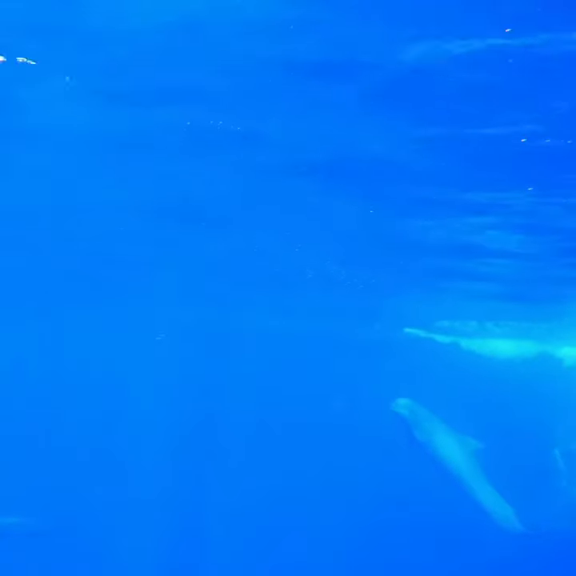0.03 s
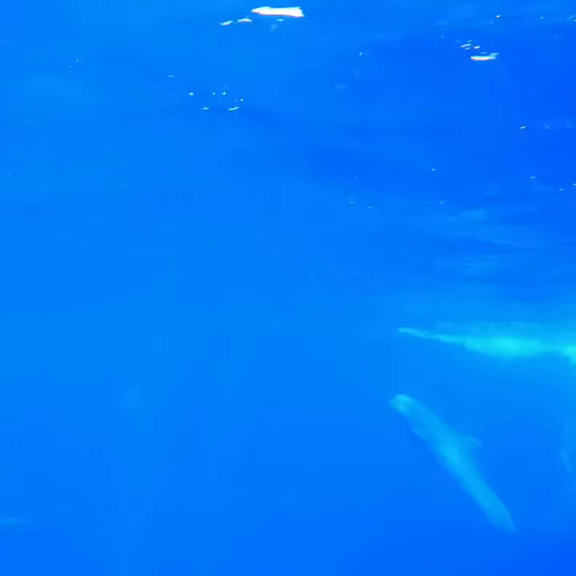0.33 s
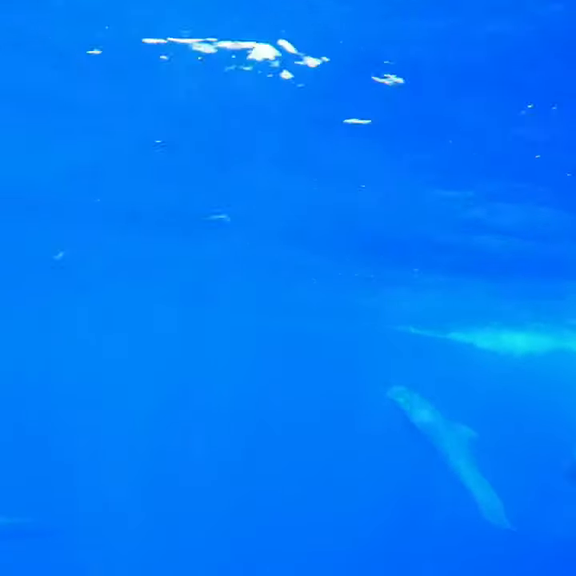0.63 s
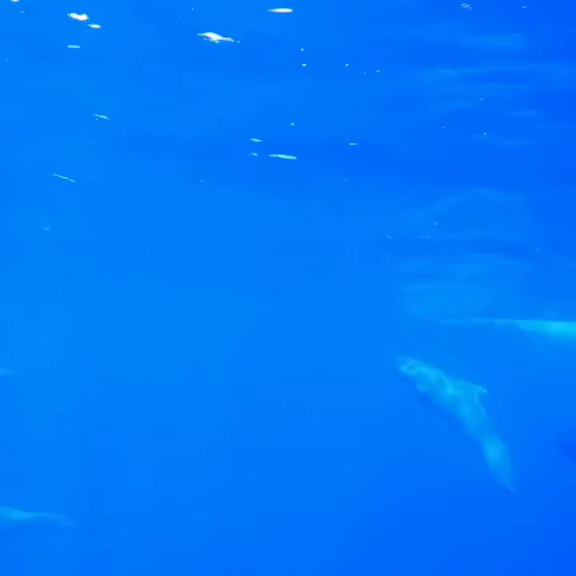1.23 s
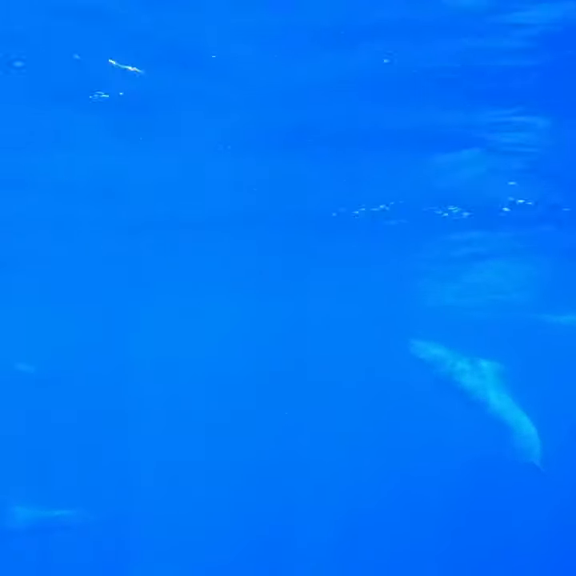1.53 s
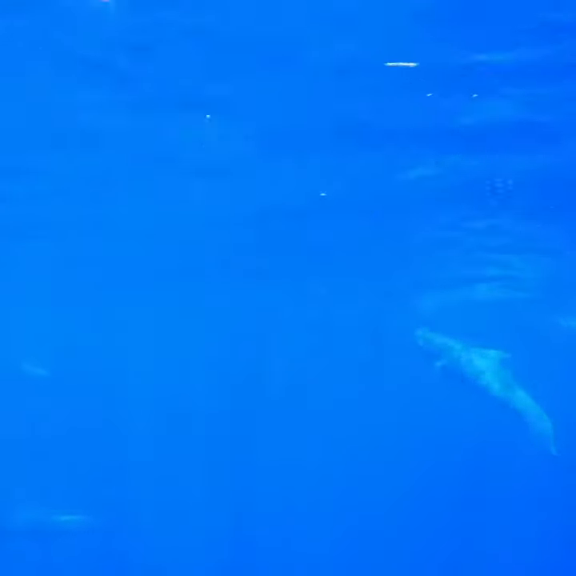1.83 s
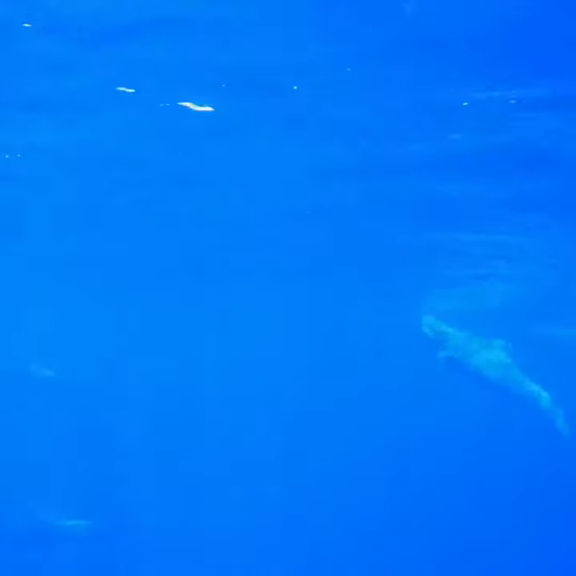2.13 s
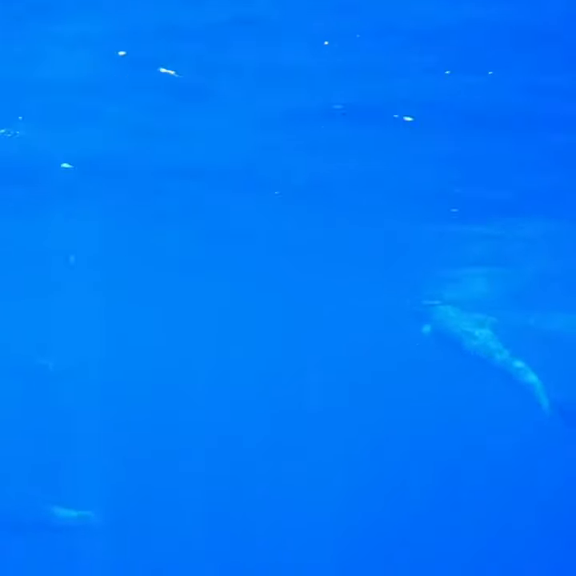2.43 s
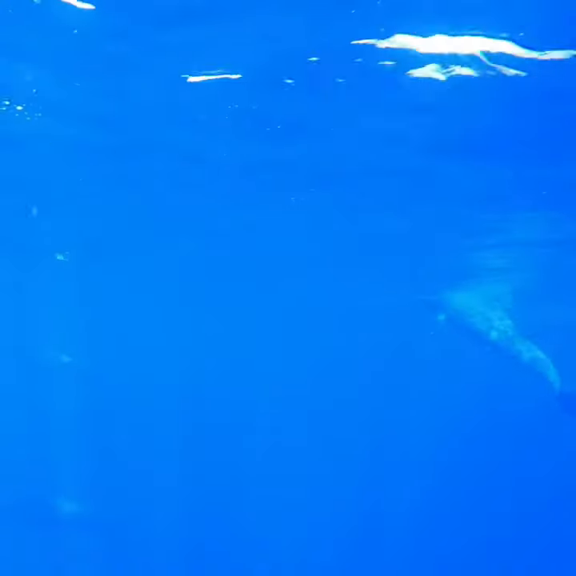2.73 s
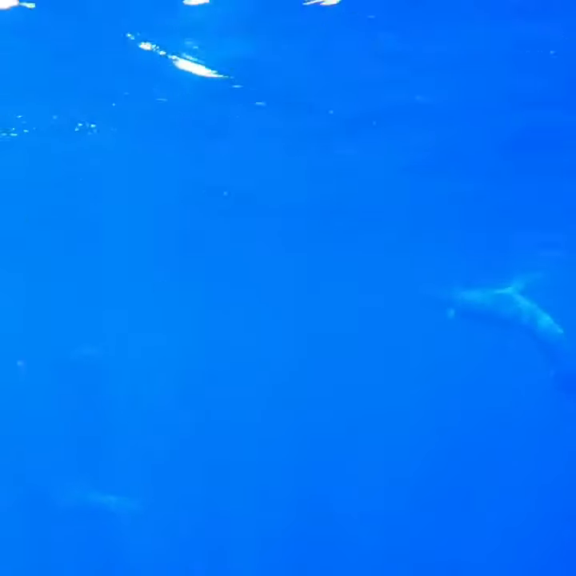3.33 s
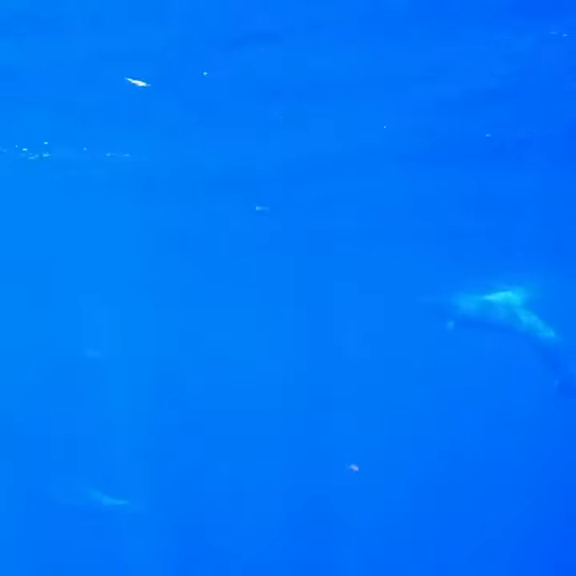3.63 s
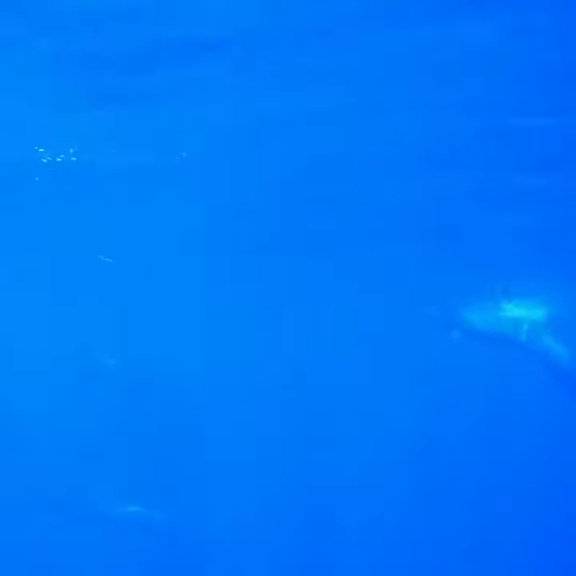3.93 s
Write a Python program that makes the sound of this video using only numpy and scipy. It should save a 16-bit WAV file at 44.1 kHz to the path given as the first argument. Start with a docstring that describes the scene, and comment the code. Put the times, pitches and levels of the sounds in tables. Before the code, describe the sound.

Whales click close to an underwater microphone. After a brief calm wash, click trains and small chirps sound among low rumble, bubbles and waves thumping a boat hull. The clicks slow and grow louder, ending in a fast buzz.

```python
"""Whales under water, beside a boat

The microphone is in a submerged camera housing. Calm water with a few distant clicks fades out; after a
cut, a second scene of rough water fades in: the housing rumbles, bubbles ring, waves slap the hull and
trap air. Close by, one whale nears with slowing clicks that ring the housing, a second chirps between
them, and a fast buzz ends it."""
import sys
import numpy as np
from scipy import signal
from scipy.fft import rfft, irfft, next_fast_len
from scipy.io import wavfile
from scipy.ndimage import uniform_filter1d, map_coordinates

SR = 44100
rng = np.random.default_rng(int(sys.argv[2]) if len(sys.argv) > 2 else 0)


def wav_record(signal):
    """Record a signal, one row per channel, as 16-bit PCM in the file named by sys.argv[1]."""
    frames = np.transpose(np.atleast_2d(signal))
    bounded = np.clip(frames, -1, 1)
    # unit amplitude maps onto the largest positive 16-bit level
    quanta = np.round(bounded * 32767).astype(np.int16)
    wavfile.write(sys.argv[1], SR, quanta)


N = 176400

# modes of the housing around the microphone: pitch_hz, gain_db, t60_s
HOUSING_MODES = [(513,0.5,0.058),(770,0,0.022),(1190,-13.5,0.019),(2153,4,0.007)]
# how busy the water along the hull is: time_s, wash_db, hiss_db
WATER_LEVELS = [(.68,-46.5,-62),(1.1,-44,-62.5),(1.75,-46.5,-62.5),(2.1,-45.5,-62),(2.4,-44,-60),(2.65,-39,-59.5),(2.97,-47.5,-59),(3.07,-45,-53.5),(3.17,-36.5,-61.5),(3.27,-44,-57),(3.45,-45,-59),(3.75,-43,-57),(3.84,-41,-56.5),(4,-50,-56)]


def amp(db):
    return 10 ** (np.asarray(db) / 20)


def unit(x):
    return x / np.sqrt(np.mean(x ** 2) + 1e-20)


def clock(size):
    return np.arange(size) / SR


def gain_at(spectrum, hz):
    """Linear gain from (Hz, dB) points on a log frequency axis."""
    points_hz, db = np.transpose(spectrum)
    return amp(np.interp(np.log(hz + 1), np.log(points_hz + 1), db))


def curves(rows):
    """One value per sample for each column after the time."""
    times, *columns = np.transpose(rows)
    return [np.interp(clock(N), times, column) for column in columns]


def wobble(per_s):
    """A smooth random curve with per_s knots a second."""
    return map_coordinates(rng.standard_normal(1024), [clock(N) * per_s], mode="wrap")


def filtered(x, response):
    """x shaped by a function of frequency."""
    size = next_fast_len(N + SR // 2)
    return irfft(rfft(x, size) * response(np.fft.rfftfreq(size, 1 / SR)), size)[..., :N]


def noise(spectrum):
    """Coloured noise of rms 1."""
    return unit(filtered(rng.standard_normal(N), lambda hz: gain_at(spectrum, hz)))


def patchy(x, depth_db):
    """Random gain patches over time and frequency, rms 1."""
    bins = signal.stft(x, nperseg=512)[2]
    patches = uniform_filter1d(rng.standard_normal(bins.shape), size=5, axis=0)
    patches = unit(uniform_filter1d(patches, size=4, axis=1))
    return unit(signal.istft(bins * amp(depth_db * patches), nperseg=512)[1][:N])


def swell(t, peak_s):
    """Rises to 1 at peak_s and dies away."""
    return t / peak_s * np.exp(1 - t / peak_s)


def ring(modes, rise_s, scatter_db, detune):
    """Damped modes, a little different at every blow."""
    t, out = clock(8192), np.zeros(8192)
    for k, (hz, db, t60) in enumerate(modes):
        decay = amp(db + scatter_db * rng.normal() - 60 * t / t60)
        pitch_hz = hz * (1 + detune * rng.normal())
        out += (-1) ** k * decay * np.sin(2 * np.pi * pitch_hz * t)
    return (1 - np.exp(-t / rise_s)) * out


def chirp(hz, glide, rise_s, glide_s=0.00054):
    """A few cycles that fall onto their pitch."""
    t = clock(2048)
    pitch_hz = hz * (1 + glide * np.exp(-t / glide_s))
    return swell(t, rise_s) ** 2 * np.sin(2 * np.pi * np.cumsum(pitch_hz) / SR)


def add(track, start_s, sound):
    part = track[max(round(start_s * SR), 0):][:len(sound)]
    part += sound[:len(part)]


def calm_water(sway_hz=9.9):
    """A quiet wash and a deep sway of the housing, with dull clicks far from the microphone."""
    wash_spectrum = [(20,11.5),(35,-1),(55,-9.5),(100,-20),(125,-28),(160,-19),(200,-31),(300,-44.5),(450,-42.5),(590,-38),(700,-48),(850,-47.5),(1050,-51.5),(1400,-52.5),(1750,-60),(2100,-57),(2600,-67.5),(3500,-81),(6000,-110)]  # calm water: frequency_hz, gain_db
    sway_levels = [(0,-35),(.08,-13),(.17,-20.5),(.27,-12),(.42,-12),(.5,-18.5),(.54,-32)]  # sway of the housing: time_s, level_db
    far_clicks = [(.119,-62.5),(.248,-62.5),(.375,-61),(.518,-62.5)]  # distant clicks: start_s, gain_db
    far_modes = [(550,10.5,0.077),(860,10.5,0.026),(1410,9.5,0.014),(2110,12.5,0.018),(2840,-0.5,0.017)]  # their ring: pitch_hz, gain_db, t60_s
    sway = amp(curves(sway_levels)[0]) * np.sin(2 * np.pi * sway_hz * clock(N))
    out = amp(-23.5) * noise(wash_spectrum) + sway
    for start_s, db in far_clicks:
        add(out, start_s, amp(db) * ring(far_modes, rise_s=0.0008, scatter_db=1, detune=0.01))
    return out


def rough_water():
    """Slow buffeting of the housing, the wash along the hull, a breaking wave and a fine hiss."""
    rumble_spectrum = [(15,-14),(25,1),(33,5.5),(41,1),(50,-12),(62,-18),(80,-22),(100,-18),(130,-36),(200,-37.5),(400,-95.5)]  # buffeting: frequency_hz, gain_db
    rumble_levels = [(0.68, -16.5), (0.85, -25.5), (0.88, -17), (1.06, -21.5), (1.09, -26.5), (1.37, -17.5),
                     (1.4, -24.5), (1.98, -19), (2.01, -24), (2.63, -18), (2.93, -22.5), (2.97, -43),
                     (3.0, -27.5), (3.34, -23), (3.4, -19), (3.46, -31), (3.52, -18), (4.0, -26)]  # its strength: time_s, level_db
    wash_spectrum = [(100,5.5),(180,2.5),(230,-1.5),(300,-0.5),(380,-2),(500,3.5),(640,-19),(780,-9.5),(960,-35),(1160,-12.5),(1350,-38.5),(1680,-13.5),(2000,-49),(3000,-74)]  # wash on the hull: frequency_hz, gain_db
    breaker_spectrum = [(400,-14),(700,17),(1200,8.5),(1700,6),(2500,-2),(3200,-21),(5000,-16.5),(7000,-39)]  # breaking wave: frequency_hz, gain_db
    breaker_levels = [(3.029,-43.5),(3.064,-40.5),(3.1,-46.5),(3.149,-38.5),(3.199,-43),(3.261,-56.5)]  # its strength: time_s, level_db
    hiss_spectrum = [(1000,-3),(1700,6.5),(2100,-1),(2700,-0.5),(3400,-8),(4200,-6.5),(5050,-7.5),(5600,-15.5),(6800,-13),(7800,-25),(9500,-40.5),(11000,-64)]  # fine hiss: frequency_hz, gain_db
    wash_db, hiss_db = curves(WATER_LEVELS)
    flow = noise(rumble_spectrum)
    flow_power = np.abs(uniform_filter1d(flow ** 2, size=SR // 6))
    even_flow = unit(flow / np.sqrt(flow_power + 0.015))
    rumble = amp(curves(rumble_levels)[0]) * even_flow
    wash = amp(wash_db + 2.87 * wobble(per_s=35)) * patchy(noise(wash_spectrum), depth_db=4)
    breaker_db = np.interp(clock(N), *np.transpose(breaker_levels), left=-120, right=-120)
    breaker = amp(breaker_db) * patchy(noise(breaker_spectrum), depth_db=2.5)
    hiss = amp(hiss_db - 1.5 + 1.3 * wobble(per_s=60)) * patchy(noise(hiss_spectrum), depth_db=3)
    return rumble + wash + breaker + hiss


def bubble(hz, t60, climb_per_s=0.54, waver_per_s=140, attack_s=0.0019):
    """A damped tone that wavers as the bubble changes shape and rises as it climbs."""
    t = clock(int(t60 * SR) + 256)
    waver = 0.02 * np.interp(t * waver_per_s, np.arange(64), rng.standard_normal(64))
    phase = 2 * np.pi * np.cumsum(hz * (1 + climb_per_s * t + waver)) / SR
    return amp(-60 * t / t60) * (1 - np.exp(-t / attack_s)) * np.sin(phase)


def swarm(per_s, centre_hz, spread, gain_db, cycles, tilt_db_per_octave=-8):
    """Random bubbles, the large ones lower and louder."""
    out = np.zeros(N)
    for when, pitch, chance in rng.uniform(0.01, 1, (4000, 3))[:int(per_s * N / SR)]:
        hz = min(centre_hz * (pitch / (1 - pitch)) ** (spread / 2), 7000)
        strength = amp(gain_db + tilt_db_per_octave * np.log2(hz / centre_hz)) * -np.log(chance)
        add(out, when * N / SR, strength * bubble(hz, t60=cycles / hz))
    return out


def bubbles():
    """A few clear bubbles among many faint ones; small ones follow the hiss, large ones the wash."""
    clear_bubbles = [(.826,4200,-51,0.032),(.853,922,-13.5,0.024),(0.976,1120,-52.5,0.12),(1.097,1640,-49,0.12),(1.132,761,-38.5,0.1),(1.166,3740,-46.5,0.016),(1.268,1635,-52,0.12),(1.29,1142,-42.5,0.14),(1.574,1080,-43.5,0.047),(2.227,517,-24.5,0.16),(2.265,1380,-35.5,0.039),(2.314,714,-26.5,0.057),(2.508,5000,-36,0.011),(2.532,1600,-37,0.03),(3.026,3870,-36.5,0.013),(3.069,982,-22,0.029),(3.251,1760,-38.5,0.056),(3.279,2030,-40,0.042),(3.286,1145,-33.5,0.053),(3.304,856,-35,0.056),(3.346,701,-30,0.068),(3.773,1590,-32.5,0.022)]  # single bubbles: start_s, pitch_hz, level_db, t60_s
    wash_db, hiss_db = curves(WATER_LEVELS)
    fizz = swarm(per_s=58, centre_hz=1006, spread=0.5, gain_db=5, cycles=49)
    froth = swarm(per_s=330, centre_hz=3320, spread=0.35, gain_db=-3.5, cycles=26)
    gurgle = swarm(per_s=70, centre_hz=380.7, spread=0.3, gain_db=-4.5, cycles=22)
    out = amp(hiss_db) * (fizz + froth) + amp(wash_db) * gurgle
    for start_s, hz, db, t60 in clear_bubbles:
        add(out, start_s, amp(db) * bubble(hz, t60))
    return out


def snap(spectrum, size=2048):
    """The shortest causal pulse with this spectrum, peak 1."""
    cepstrum = irfft(np.log(gain_at(spectrum, np.fft.rfftfreq(size, 1 / SR))))
    cepstrum[1:size // 2] *= 2  # fold onto positive time: minimum phase
    cepstrum[size // 2 + 1:] = 0
    pulse = irfft(np.exp(rfft(cepstrum)))
    return pulse / np.abs(pulse).max()


def scattered(pulse):
    """A click, smeared by its paths through the housing to the microphone."""
    t = clock(512)
    paths = amp(-21.5) * swell(t, peak_s=0.00062) * rng.standard_normal(len(t))
    paths[0] = 1  # the direct path
    return signal.fftconvolve(pulse, paths / np.linalg.norm(paths))


def near_whale(snap_delay_s=0.00046):
    """Sharp clicks at close range; each also rings the camera housing."""
    clicks = [(0.703,-50,-63),(.749,-52.5,-67),(0.799,-55.5,-71),(0.842,-52.5,-44),(.881,-50,-47),(0.923,-51.5,-49),(0.97,-55,-52),(1.024,-53,-48),(1.068,-54,-45.5),(1.122,-51.5,-59),(1.202,-47.5,-54),(1.259,-48.5,-42.5),(1.312,-50,-64),(1.363,-47.5,-51),(1.417,-47,-41),(1.481,-46,-60),(1.542,-49.5,-52),(1.611,-47.5,-52.5),(1.685,-47,-51),(1.787,-46,-69),(2.763,-52,-33.5),(2.807,-59,-51.5),(2.83,-46.5,-34.5),(2.88,-53.5,-56),(2.907,-46.5,-30.5),(2.998,-44.5,-30),(3.089,-43.5,-29.5),(3.208,-41.5,-54),(3.323,-41,-31),(3.419,-39.5,-31.5),(3.533,-38.5,-31.5),(3.651,-38,-34.5),(3.813,-39,-31.5)]  # the nearest whale's clicks: start_s, snap_gain_db, ring_gain_db
    snap_spectrum = [(300,-17),(1500,-16.5),(2300,4.5),(3300,-8),(4100,4),(4500,-35),(4900,5),(5350,-6.5),(6200,4.5),(6900,-5),(7400,-3.5),(8200,-8.5),(9900,-13),(11500,-38)]  # one click: frequency_hz, gain_db
    out, pulse = np.zeros(N), snap(snap_spectrum)
    for start_s, snap_db, ring_db in clicks:
        add(out, start_s + snap_delay_s, amp(snap_db + 1.5) * scattered(pulse))
        housing = ring(HOUSING_MODES, rise_s=0.0015, scatter_db=-2.5, detune=0.044)
        add(out, start_s, amp(ring_db + 2.5) * housing)
    return out


def air_pockets(push_hz=178, push_delay_s=0.002):
    """Air caught under the hardest waves pings, then collapses with one low push."""
    pockets = [(0.8482,1410,-26,-22),(1.427,1394,-35,-26),(2.3058,1320,-22.5,-14),(3.1308,965,-32.5,-30),(3.2268,1080,-30.5,-19.5)]  # trapped air: start_s, ping_hz, ping_db, push_db
    out, t = np.zeros(N), clock(2048)
    push = swell(t, peak_s=0.0025) ** 2 * np.sin(2 * np.pi * push_hz * t)
    for start_s, hz, ping_db, push_db in pockets:
        add(out, start_s, amp(ping_db) * chirp(hz, glide=0.12, rise_s=0.0021))
        add(out, start_s + push_delay_s, amp(push_db) * push)
    return out


def hull_slaps():
    """A wave surges up, cracks on the hull, splashes and sets it ringing."""
    # waves on the hull: start_s, thump_db, splash_db, crack_db, swell_s, thump_tilt_db_per_octave
    waves = [(0.85,-18,-22,-41.5,0.0035,-1),(1.057,-44,-50,-71,0.0027,0.5),(1.351,-29.5,-41.5,-70,0.0024,-0.5),(1.432,-19,-24,-50,.0034,-3.5),(1.672,-31.5,-40.5,-70,.0011,3),(1.869,-19.5,-35,-58,.0084,-.5),(1.902,-20,-42,-69.5,.0034,-0.5),(1.952,-39,-58,-80,.003,-1.5),(2.103,-37.5,-56,-71,0.0035,-3.5),(2.202,-26,-37,-64,0.0046,-2),(2.307,-17,-21.5,-41,0.0039,-2),(2.348,-32.5,-49,-73,.003,-0.5),(2.509,-38.5,-53.5,-46,.0018,-1),(2.708,-29,-34,-46,0.0012,-1),(2.769,-20.5,-37,-49.5,0.0017,1.5),(2.779,-14,-26,-50.5,0.0032,1),(3.064,-51,-42,-59,0.0029,0),(3.13,-22.5,-28,-41.5,0.0034,0.5),(3.15,-36,-42.5,-69,0.0099,0),(3.201,-21,-36.5,-53,0.0022,2),(3.227,-23.5,-24.5,-38,0.0019,2.5),(3.475,-40.5,-38,-69,0.0023,2),(3.667,-19.5,-33,-55,0.0027,-1)]
    hull_modes = [(97.7,-10,0.12),(186.4,-1.5,0.11),(262,1,0.033),(320.7,0.5,0.062),(495.7,5.5,0.046),(729,3.5,0.02),(1130,-23.5,0.055)]  # ring of the hull: pitch_hz, gain_db, t60_s
    splash_spectrum = [(100,-12.5),(300,10.5),(600,2.5),(950,-3.5),(1450,-3.5),(1800,-11.5),(2200,-27),(3200,-28),(6000,-75)]  # splashing water: frequency_hz, gain_db
    crack_spectrum = [(500,-7.5),(2400,7),(3200,-6.5),(4000,3),(5100,1),(6000,-6.5),(8000,-26),(11000,-38.5)]  # the impact: frequency_hz, gain_db
    crack_rise_s, crack_fall_s = 0.00014, 0.0023
    surge_rise_s, surge_fall_s = 0.01, 0.011
    pivot_hz = 350
    thumps, splash_level, crack_level = np.zeros((3, N))
    t = clock(8192)
    crack_shape = np.exp(-t / crack_fall_s) * (1 - np.exp(-t / crack_rise_s))
    for start_s, thump_db, splash_db, crack_db, swell_s, tilt in waves:
        modes = [(hz, db + tilt * np.log2(hz / pivot_hz), t60) for hz, db, t60 in hull_modes]
        add(thumps, start_s, amp(thump_db) * ring(modes, rise_s=0.005, scatter_db=1, detune=0.025))
        add(splash_level, start_s, amp(splash_db) * swell(t, swell_s))
        add(crack_level, start_s, amp(crack_db) * crack_shape)
        since_s = clock(N) - start_s
        surge = np.exp(np.minimum(since_s / surge_rise_s, -since_s / surge_fall_s))
        splash_level += amp(splash_db - 12.5) * surge
    return thumps + splash_level * noise(splash_spectrum) + crack_level * noise(crack_spectrum)


def second_whale():
    """Softer, tonal clicks that stir only the housing's lowest mode."""
    chirps = [(0.965,-58.5,2700),(1.016,-59,2690),(1.073,-56.5,2670),(1.129,-55,2680),(1.185,-51.5,2680),(1.233,-49,2600),(1.28,-50,2550),(1.318,-50.5,2550),(1.356,-52,2550),(1.392,-48.5,2450),(1.431,-51,2550),(1.467,-50,2500),(1.509,-50,2520),(1.556,-48.5,2530),(1.622,-50.5,2480),(2.476,-55,2340),(2.604,-57,2400),(2.628,-61,2400),(2.657,-53,2370),(2.732,-48,2670),(3.023,-46,2350),(3.062,-38,2470)]  # tonal clicks: start_s, level_db, pitch_hz
    out = np.zeros(N)
    for start_s, db, hz in chirps:
        add(out, start_s, amp(db) * chirp(hz, glide=0.07, rise_s=0.0017))
        housing = ring(HOUSING_MODES[:1], rise_s=0.002, scatter_db=-5, detune=0.055)
        add(out, start_s, amp(db + 13) * housing)
    return out


def whale_buzz(count=12, first_s=3.8203, gap_s=0.0129, slowing_s=0.00046, swell_db_per_s=7):
    """A fast run of clicks that slows and swells: each is a snap, a falling chirp and a short ring."""
    snap_spectrum = [(1000,10),(2400,1),(3400,-12),(4500,-3),(6000,16),(7400,18),(8000,2),(8800,10),(9800,-45)]  # one click: frequency_hz, gain_db
    ring_modes = [(2200,-7.5,0.011),(2700,-16,0.0087),(776,-11,0.018)]  # its ring: pitch_hz, gain_db, t60_s
    out, pulse = np.zeros(N), snap(snap_spectrum)
    for k in range(count):
        start_s = first_s + k * gap_s + k * (k - 1) / 2 * slowing_s
        grown_db = swell_db_per_s * (start_s - first_s) + 0.5 * rng.normal()
        add(out, start_s, amp(grown_db - 51.5) * scattered(pulse))
        add(out, start_s, amp(grown_db - 38) * chirp(hz=1640, glide=0.8, rise_s=0.0025))
        tail = ring(ring_modes, rise_s=0.00057, scatter_db=2.5, detune=0.015)
        add(out, start_s, amp(grown_db - 33.5) * tail)
    return out


def stereo_image(mid, stray_delay_s=0.0005):
    """The bass stays central; the treble slowly widens and flickers between the sides."""
    balance = [(120,0),(500,-.9),(1100,-1.2),(2000,-3),(4000,.5),(8000,-1)]  # lean of the image: frequency_hz, left_over_right_db
    stray_spectrum = [(100,-42),(250,-24),(500,-12),(1500,-9),(8000,-11)]  # delayed sound that differs between the sides: frequency_hz, gain_db
    width = [(.7,-25),(1.3,-14),(2.2,-4.5),(3,-1),(4,1)]  # opening of the image: time_s, side_gain_db
    lean = filtered(mid, lambda hz: (gain_at(balance, hz) - 1) / (gain_at(balance, hz) + 1))
    stray = filtered(
        mid, lambda hz: gain_at(stray_spectrum, hz) * np.exp(-2j * np.pi * hz * stray_delay_s))
    flicker = np.sqrt(2) * np.cos(np.pi * wobble(per_s=25))
    side = amp(curves(width)[0]) * (lean + stray * flicker)
    return np.array([mid + side, mid - side])


def scene():
    """Calm water fades out; after a cut, a second scene of rough water and close whales fades in."""
    cut_s, fade_s = 0.642, 0.038
    fade = (clock(N) - cut_s) / fade_s
    rough = rough_water() + hull_slaps() + air_pockets()
    rough += near_whale() + second_whale() + whale_buzz() + bubbles()
    mid = np.clip(-fade, 0, 1) ** 2 * calm_water() + np.clip(fade, 0, 1) ** 2 * rough
    return stereo_image(mid)


def record(dry):
    """The camera keeps nothing above its band limit."""
    return filtered(dry, lambda hz: hz < 11500)


dry = scene()
out = record(dry)
wav_record(out)
```